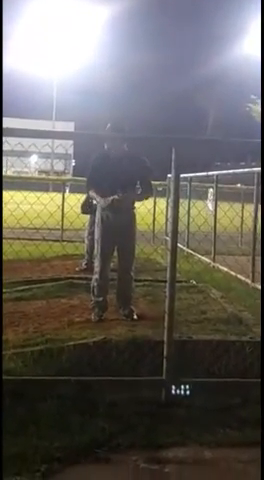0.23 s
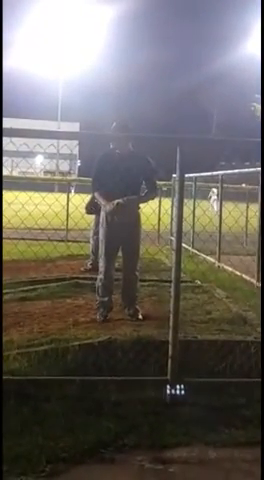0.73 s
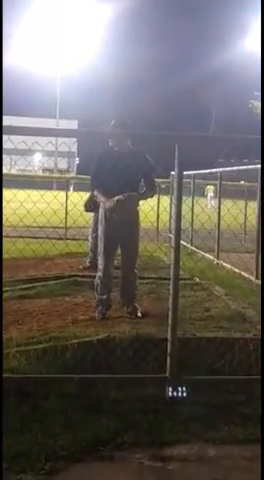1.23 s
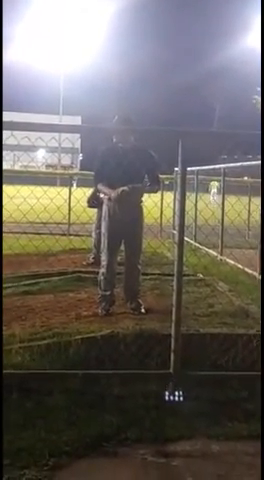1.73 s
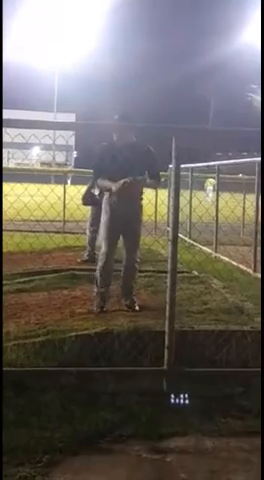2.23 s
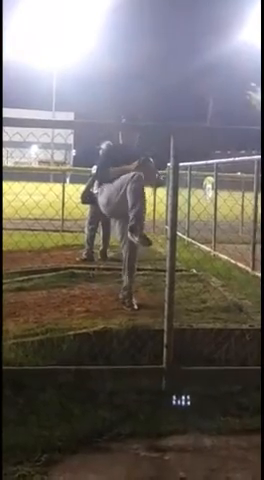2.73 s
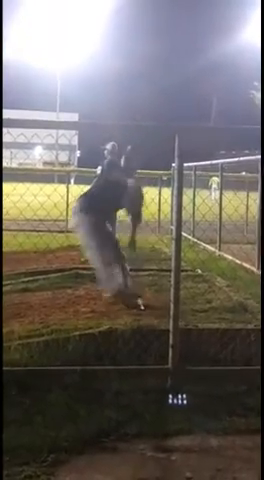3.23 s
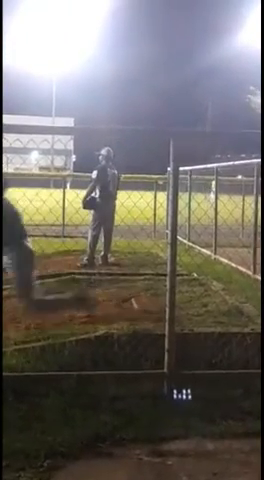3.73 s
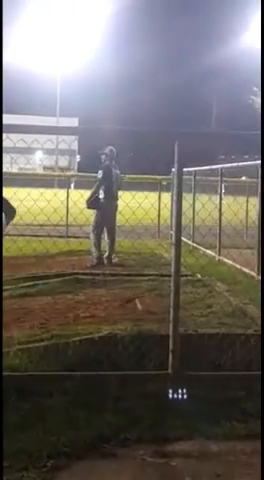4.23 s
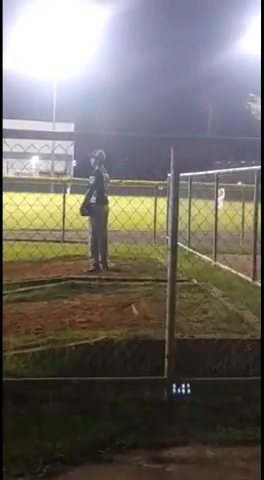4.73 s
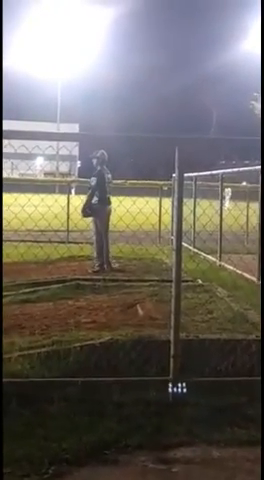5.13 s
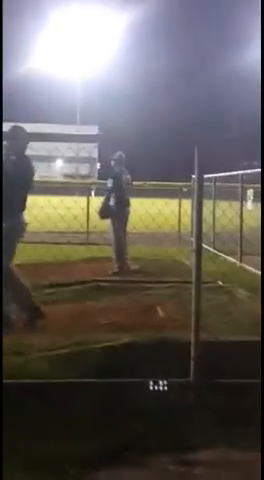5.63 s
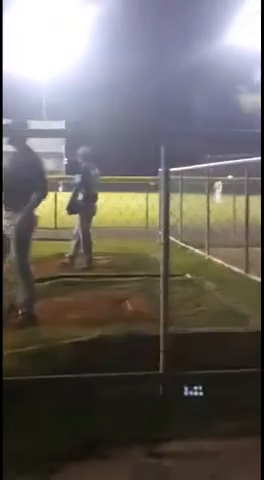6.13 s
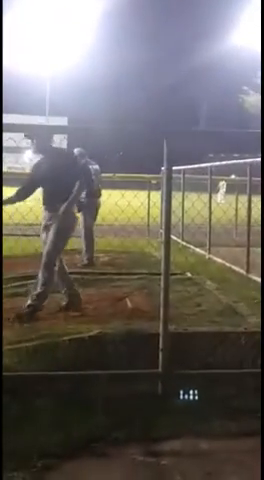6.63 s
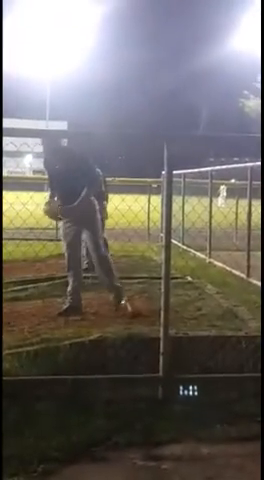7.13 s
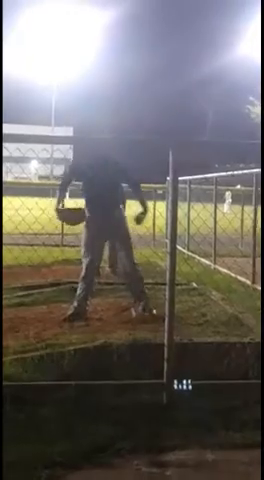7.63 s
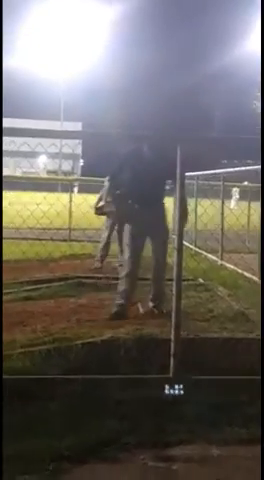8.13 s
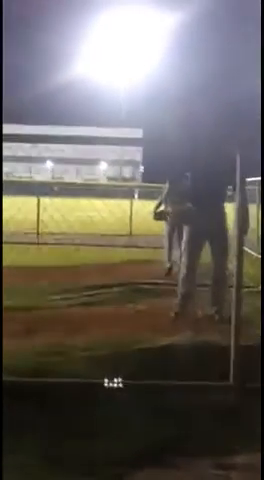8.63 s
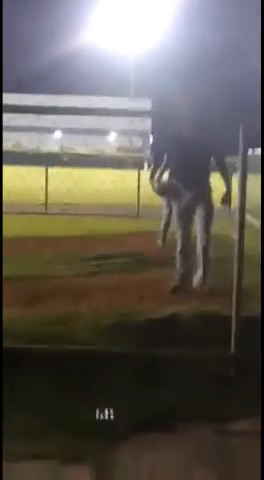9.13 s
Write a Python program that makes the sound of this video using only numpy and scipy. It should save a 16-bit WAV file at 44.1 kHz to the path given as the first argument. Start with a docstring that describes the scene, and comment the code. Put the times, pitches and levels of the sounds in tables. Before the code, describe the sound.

Crickets shimmer continuously, with pulsed trills close by and a blurred chorus farther off; soft frog croaks sit beneath. After a few quiet seconds a foot lands and gravel crunches, and a sharp leather crack rings across the open field with quick slaps of echo and a fading tail. Steps on dirt, a duller glove catch and light sandy scraping follow. Handheld microphone near the mound, mono, slight low air rumble.

```python
"""Crickets trill and far frogs murmur over a low night wash beside a ballfield: pulsed tones and shaped noise.
A pitcher warms up: his cleats thud (damped sines) and scrape (grainy noise) on the dirt mound.
His pitch cracks into the catcher's mitt, a noise burst over a cavity thump; discrete echoes and a decaying
scatter tail come back from walls, fences and stands.
He walks back over the dirt, takes the softer return throw in his own glove, and scrapes at the mound."""
import sys
import numpy as np
from scipy import signal
from scipy.fft import rfft, irfft, next_fast_len
from scipy.io import wavfile
from scipy.ndimage import uniform_filter1d

SR = 44100
rng = np.random.default_rng(int(sys.argv[2]) if len(sys.argv) > 2 else 0)


def waveform_to_disk(signal):
    """Save audio, clipped to [-1, 1], as 16-bit WAV at the path in sys.argv[1]."""
    frames = np.transpose(np.atleast_2d(signal))
    scaled = np.clip(frames, -1, 1) * 32767
    samples = np.round(scaled).astype(np.int16)
    wavfile.write(sys.argv[1], SR, samples)


N = 413655  # samples
TIME = np.arange(N) / SR


def amp(db):
    """Decibel law: 20 dB is a factor of ten in amplitude."""
    return 10 ** (np.asarray(db) / 20)


def unit(x):
    """Normalization to unit root-mean-square."""
    return x / np.sqrt(np.mean(x ** 2) + 1e-20)


def read(points, hz):
    """Interpolation of a spectrum along logarithmic frequency."""
    point_hz, value = np.transpose(points)
    return np.interp(np.log(hz + 1), np.log(point_hz + 1), value)


def add(mix, start_s, sound):
    """Superposition: a sound is summed into the mix from its start time."""
    part = mix[max(round(start_s * SR), 0):][:len(sound)]
    part += sound[:len(part)]


def swell(middle_s, half_width_s):
    """Gaussian envelope: a smooth rise and fall around a moment."""
    return np.exp(-((TIME - middle_s) / half_width_s) ** 2)


def drift(corner_hz):
    """Low-passed noise: a random wander of unit size, no faster than about the corner."""
    size = next_fast_len(N, real=True)
    spectrum = rfft(rng.standard_normal(size))
    low_pass = 1 / (1 + (np.fft.rfftfreq(size, 1 / SR) / corner_hz) ** 4)
    return unit(irfft(spectrum * low_pass, size)[:N])


def colour(x, points, size=2048):
    """Minimum-phase filtering: a causal filter with the given spectrum keeps the power of white noise."""
    hz = abs(np.fft.fftfreq(size, 1 / SR))
    log_gain = np.log(amp(read(points, hz)))
    # the Hilbert transform of the log gain gives the minimum phase
    taps = np.fft.ifft(np.exp(np.conj(signal.hilbert(log_gain)))).real[:size // 2]
    return signal.fftconvolve(x, taps / np.linalg.norm(taps))[:len(x)]


def grit(size, spread_db):
    """Granular noise: grains of 20 samples each have their own strength."""
    strength = np.repeat(rng.standard_normal(size // 20 + 1), 20)[:size]
    return unit(rng.standard_normal(size) * amp(spread_db * np.clip(strength, -2, 2)))


def patchy(x, depth_db):
    """Multipath interference: narrow bands swell and fade at random."""
    spectrum = signal.stft(x, SR, nperseg=512, noverlap=384)[2]
    field = uniform_filter1d(rng.standard_normal(spectrum.shape), 9, 1)  # smooth in time
    field = uniform_filter1d(field, 3, 0)  # smooth in frequency
    gain = unit(amp(depth_db * np.clip(unit(field), -2, 1.5)))
    return signal.istft(spectrum * gain, SR, nperseg=512, noverlap=384)[1][:len(x)]


def scatter(x, t60, wet):
    """Diffuse reflection: a noise tail losing 60 dB in t60 seconds is convolved in beside the direct sound."""
    t = TIME[:SR // 2]
    tail = rng.standard_normal(len(t)) * amp(-60 * t / t60)
    return x + wet * signal.fftconvolve(x, tail / np.linalg.norm(tail))[:len(x)]


def thump(hz, length):
    """Damped cavity resonance: a few cycles swell quickly and die."""
    t = np.arange(int(2 * length * SR)) / SR
    u = t / (.4 * length)
    return u ** 2 * np.exp(1 - u ** 2) * np.sin(2 * np.pi * hz * t)


# spectrum of the distant town wash: pitch_hz [Hz], relative level_db [dB]
AIR_SPECTRUM = [(20, -16), (45, -2), (70, 3.5), (150, 4), (300, -4), (700, -7), (1200, -6.5), (2000, -14.5),
                (3200, -24.5), (4300, -22), (7200, -18), (8800, -43), (12000, -39), (14500, -45)]
# low swells of air on the microphone: middle_s [s], half_width_s [s], level_db [dB]
GUSTS = [(.2, .16, -63), (.58, .11, -62), (4.92, .05, -64), (5.4, .18, -69), (6.15, .16, -65)]
CALM_DB = -80.5  # rumble between gusts


def night_air():
    """Shaped noise: a distant town wash with a low rumble that swells in gusts."""
    wash = colour(rng.standard_normal(N), AIR_SPECTRUM) * amp(-71.5 + .8 * drift(2))
    rumble_spectrum = [(20, -8), (55, 4), (110, -2), (180, -7.5), (350, -27), (1000, -65)]
    rumble = colour(rng.standard_normal(N), rumble_spectrum)
    gusts = sum(amp(db) * swell(middle, half_width) for middle, half_width, db in GUSTS)
    return wash + rumble * (amp(CALM_DB) + gusts)


def croak(hz, length, rasp_hz):
    """Frequency modulation by noise: one short note with a rough pitch."""
    t = TIME[:int(length * SR)]
    turns = np.cumsum(hz + rasp_hz * rng.standard_normal(len(t))) / SR
    return np.hanning(len(t)) * np.sin(2 * np.pi * turns)


def frogs(hz, spread_hz, per_s, length, level_db, rasp_hz):
    """Random superposition: short far notes, each of its own time, pitch, strength and length."""
    out = np.zeros(N)
    draws = rng.uniform(-1.3, 1, (int(per_s * N / SR), 4))
    for k, (when, pitch, size, span) in enumerate(draws):
        note = croak(hz + spread_hz * pitch, length * 2 ** (.6 * span), rasp_hz)
        add(out, (k + .5 + when) / per_s, amp(6 * size) * note)
    return amp(level_db) * unit(out)


# gain of the high peepers over time: time_s [s], gain_db [dB]
PEEPER_GAIN = [(0, -3), (.75, 2), (1.75, -8), (2.3, 3), (4, -3), (6.2, 1), (7.7, -3), (9.38, 0)]
# merged far frogs: pitch_hz [Hz], half_width_hz [Hz], mean level_db [dB]
MURMUR = [(720, 55, -79), (2330, 170, -83)]
# louder croaks: start_s [s], pitch_hz [Hz], length_s [s], level_db [dB]
CROAKS = [(1.49, 670, .08, -58), (3.527, 634, 0.053, -51), (5.71, 660, 0.049, -55.5),
          (6.14, 720, .055, -54), (7.021, 729, 0.11, -55.5), (7.611, 626, 0.051, -56)]


def pond():
    """Blurring by distance: low croakers and high peepers; the farthest merge into narrow noise bands."""
    out = frogs(hz=705, spread_hz=50, per_s=9, length=.055, level_db=-74.5, rasp_hz=380)
    peepers = frogs(hz=2370, spread_hz=170, per_s=20, length=.07, level_db=-75, rasp_hz=520)
    out += peepers * amp(np.interp(TIME, *np.transpose(PEEPER_GAIN)))
    for hz, width_hz, db in MURMUR:
        out += amp(db + 4 * drift(7)) * drift(width_hz) * np.sin(2 * np.pi * hz * TIME)
    for start, hz, length, db in CROAKS:
        add(out, start, amp(db) * croak(hz, length, rasp_hz=464))
    return scatter(out, t60=0.27, wet=.5)


def katydid(start=3.49, hz=8100, rate=8.57, quicken=.17, tick_share=.035, level_db=-75):
    """Pulsed narrow-band noise: a faint high tick slowly quickens, uneven and blurred by the grass."""
    t = np.maximum(TIME - start, 0)
    u = (rate * t + .5 * quicken * t ** 2) % 1 / tick_share  # rate per s, quicken per s squared
    ticks = u * np.exp(1 - u) * amp(level_db + 3 * drift(4))
    return scatter(ticks * drift(130) * np.sin(2 * np.pi * hz * TIME), t60=.35, wet=.9)


def wing_tone(phase, pitch, depth):
    """Stridulation: the wing rings at a pitch and each stroke of the file pulses it."""
    pulse = 1 - depth + depth * np.sin(np.pi * phase) ** 2
    return pulse * np.sin(2 * np.pi * np.cumsum(pitch) / SR)


def cricket(hz, strokes, sag_hz, depth, wander_hz, wet):
    """Continuous stridulation: the pitch sags during each stroke of the file."""
    phase = np.cumsum(strokes * (1 + .012 * drift(3))) / SR % 1
    pitch = hz + sag_hz * (.5 - phase) + wander_hz * drift(6)
    return unit(scatter(wing_tone(phase, pitch, depth), t60=.3, wet=wet))


def song(rows, strokes, sag_hz, depth, jitter_hz, flutter_db, ramp_s, wet):
    """Gated stridulation: each call swells, holds one wing pitch and stops; strokes pulse and pull it."""
    out = np.zeros(N)
    jitter, flutter = jitter_hz * drift(90), unit(amp(flutter_db * drift(14)))
    for (start, length, hz, db), (place, turn) in zip(rows, rng.random((len(rows), 2))):
        t = TIME[:int((length + ramp_s) * SR)]
        first = int(place * N / 2)  # each call takes its own stretch of the wander
        part = slice(first, first + len(t))
        phase = (strokes * t + turn) % 1
        pitch = hz + sag_hz * (.5 - phase) + jitter[part]
        wing = unit(wing_tone(phase, pitch, depth))
        gate = np.clip(np.minimum(t, t[-1] - t) / ramp_s, 0, 1)
        add(out, start - ramp_s / 2, amp(db) * gate * flutter[part] * wing)
    return scatter(out, t60=.16, wet=wet) / np.hypot(1, wet)


# pitches of the fainter random chirps: pitch_hz [Hz], rate [chirps per s], middle level_db [dB]
SINGERS = [(5760, 9, -69), (6350, 9, -70.5), (6770, 7, -72.5)]
CHIRP_S, CHIRP_SPREAD_HZ, CHIRP_SPREAD_DB = .06, 130, 4


def stray_chirps():
    """Random sequence: rows of faint chirps, uneven in time, length, pitch and strength."""
    rows = []
    for hz, per_s, db in SINGERS:
        draws = rng.uniform(-1, 1, (int(per_s * N / SR), 4))
        for k, (when, span, pitch, size) in enumerate(draws):
            start, length = (k + .5 + when) / per_s, CHIRP_S * 2 ** (.5 * span)
            rows.append((start, length, hz + CHIRP_SPREAD_HZ * pitch, db + CHIRP_SPREAD_DB * size))
    return rows


# far chorus: pitch_hz [Hz], mean level_db [dB], rate [wing strokes per s]
CHORUS = [(4800, -76, 52), (4930, -64, 37), (4964, -64.5, 63), (5046, -63.5, 44), (5097, -67.5, 75)]
# lone far singers that never pause: pitch_hz [Hz], mean level_db [dB], rate [wing strokes per s]
DRONES = [(5750, -74, 31), (6260, -77, 58), (6850, -76.5, 70)]
# clean trills of the nearest crickets: start_s [s], length_s [s], pitch_hz [Hz], level_db [dB before a lift]
TRILLS = [(0, 0.25, 6810, -64.5), (0.32, 0.65, 6805, -63.0), (1.24, 0.49, 6845, -63.0),
          (1.24, 0.22, 6385, -58.5), (3.22, 0.4, 6250, -64.5), (3.58, 0.8, 6845, -64.0),
          (5.84, 0.32, 6845, -66.5), (6.15, 0.32, 6250, -63.5), (7.9, 0.68, 6250, -63.0),
          (9.2, 0.18, 6230, -64.5)]
# blurred chirps farther off in the grass: start_s [s], length_s [s], pitch_hz [Hz], level_db [dB]
CHIRPS = [(0.16, 0.08, 5755, -64.0), (0.6, 0.11, 5720, -63.5), (0.67, 0.09, 6350, -57.5),
          (1.46, 0.09, 5760, -62.5), (1.56, 0.06, 6395, -60.0), (1.64, 0.16, 5745, -63.5),
          (2.0, 0.45, 6820, -66.5), (2.38, 0.12, 5800, -60.5), (2.92, 0.28, 6785, -64.5),
          (3.05, 0.19, 5805, -62.0), (5.13, 0.17, 5770, -62.5), (5.78, 0.22, 5765, -61.0),
          (7.5, 0.32, 5745, -62.5)]


def crickets():
    """Distance by scattering: a blurred far chorus, chirps from the grass, and a few clean trills close by."""
    far = np.zeros(N)
    for hz, db, rate in CHORUS:
        far += amp(db) * cricket(hz, rate, sag_hz=300, depth=1, wander_hz=28, wet=1.9)
    far *= amp(1.1 * drift(10))
    for hz, db, rate in DRONES:
        drone = cricket(hz, rate, sag_hz=110, depth=.6, wander_hz=22, wet=1.9)
        far += amp(db + 3 * drift(8)) * drone
    trills = song(TRILLS, strokes=152, sag_hz=70, depth=.35, jitter_hz=12, flutter_db=1.2, ramp_s=.04, wet=.35)
    chirps = song(CHIRPS + stray_chirps(), strokes=48, sag_hz=110, depth=.5, jitter_hz=42,
                  flutter_db=1.6, ramp_s=.025, wet=.6)
    haze_spectrum = [(3800, -60), (4500, -19), (4950, 6), (5350, -9.5), (5800, 2), (6400, 3.5),
                     (6900, 7), (7300, -17), (8500, -50)]
    haze = patchy(colour(rng.standard_normal(N), haze_spectrum), depth_db=4.5)
    return far + amp(.7) * trills + chirps + amp(-71.5) * haze


# small clinks and faint rings around the mound: start_s [s], pitch_hz [Hz], length_s [s], level_db [dB]
CLINKS = [(0.135, 1040, .07, -63), (0.38, 4300, 0.024, -63), (2.265, 3670, 0.046, -64),
          (2.294, 1340, 0.025, -58.5), (3.73, 1506, 0.068, -62), (3.834, 1510, .11, -63),
          (6.03, 1620, .08, -62), (8.98, 2350, .1, -59), (9.07, 1550, .09, -60)]


def clinks():
    """Impulsive excitation: each is a quick touch and a short, wavering ring."""
    out = np.zeros(N)
    for start, hz, length, db in CLINKS:
        u = np.arange(int(2 * length * SR)) / (length * SR / 4)
        turns = np.cumsum(hz + 650 * rng.standard_normal(len(u))) / SR
        add(out, start, amp(db) * u * np.exp(1 - u) * np.sin(2 * np.pi * turns))
    return out


# spectrum of sandy hiss, for slides and feet: pitch_hz [Hz], relative level_db [dB]
SAND_SPECTRUM = [(500, -35), (3000, -17), (4000, -6), (6000, 1), (8400, 9.5), (10000, -17), (14000, -12)]
# a sole slides slowly over loose sand: middle_s [s], half_width_s [s], level_db [dB]
SLIDES = [(8.99, .13, -67.5), (9.05, .055, -58.5), (9.33, .17, -65)]


def slides():
    """Stick-slip friction: sand hisses under a sliding sole that catches and slips unevenly."""
    hiss = patchy(colour(grit(N, spread_db=4.5), SAND_SPECTRUM), depth_db=5)
    hiss *= unit(amp(1.3 * drift(30)))
    return hiss * sum(amp(db) * swell(middle, half_width) for middle, half_width, db in SLIDES)


# feet on packed dirt: start_s [s], level_db [dB], pitch_hz [Hz], length_s [s]
STEPS = [(2.256, -53.5, 274, 0.019), (3.671, -41, 600, .012), (3.674, -36.5, 285, 0.01),
         (3.699, -44, 235, .02), (5.949, -53, 280, 0.04), (6.06, -39, 580, .008),
         (6.0634, -26, 235, 0.0062), (6.094, -47, 185, .022), (6.134, -48, 185, .02),
         (6.541, -54, 239.4, 0.024), (7.592, -52, 185, 0.037), (8.101, -52, 195, 0.038)]
# cleats dragged through dirt: start_s [s], length_s [s], crunch_db [dB], gravel_db [dB], sand_db [dB]
SCUFFS = [(3.666, .03, -55, -68, -85), (3.724, .07, -60, -69, -82), (3.784, .044, -49, -60, -63),
          (3.832, .049, -49.5, -60, -59), (6.054, .025, -64, -63, -59), (8.545, .06, -60, -54, -63),
          (8.622, .022, -65, -63, -59), (9.2, .06, -66, -65, -72)]
# spectrum of the low crunch: pitch_hz [Hz], relative level_db [dB]
CRUNCH_SPECTRUM = [(100, -12), (450, -2), (600, 5), (730, 6), (900, -20), (3000, -40)]
# spectrum of the gravel: pitch_hz [Hz], relative level_db [dB]
GRAVEL_SPECTRUM = [(600, -28), (1100, -20), (1520, 0), (1700, -6), (1900, 3), (2150, -4), (2450, 2),
                   (3000, -17), (3700, -8), (8000, -42)]


def feet():
    """Impact and granular friction: heels thud on the dirt and cleats drag gravel and sand along."""
    thuds, crunch, gravel, sand = np.zeros((4, N))
    for start, db, hz, length in STEPS:
        add(thuds, start, amp(db) * thump(hz, length))
    for start, length, *levels_db in SCUFFS:
        u = np.arange(int(3 * length * SR)) / (0.363 * length * SR)
        for layer, db in zip((crunch, gravel, sand), levels_db):
            add(layer, start, amp(db) * u * np.exp(1 - u) * grit(len(u), spread_db=4.5))
    scrape = colour(crunch, CRUNCH_SPECTRUM) + colour(gravel, GRAVEL_SPECTRUM) + colour(sand, SAND_SPECTRUM)
    return scatter(thuds, t60=0.33, wet=.48) + scatter(patchy(scrape, depth_db=4.5), t60=.42, wet=0.36)


# spectrum of the loud echo's rush: pitch_hz [Hz], relative level_db [dB]
STANDS_SPECTRUM = [(200, -11), (450, -15), (740, -4), (1130, 2), (1320, -9), (1500, 3), (1680, -7),
                   (2350, 5), (4000, -2), (6000, -12), (8000, -40)]
# far surfaces, one band of a pop each:
# middle_s [s], half_width_s [s], pitch_hz [Hz], half_bandwidth_hz [Hz], level_db [dB]
FAR_BANDS = [(4.545, .04, 280, 110, -42), (4.99, .08, 1490, 55, -62), (5.03, .035, 2450, 150, -52),
             (5.04, .025, 690, 90, -55), (5.11, .09, 1120, 70, -56), (5.14, .05, 770, 80, -54),
             (5.18, .09, 2170, 200, -60), (6.895, .055, 1020, 200, -50), (6.94, .05, 2350, 200, -59)]


def far_echo(middle_s=5.05, half_width_s=0.13, level_db=-52.5):
    """Selective reflection: stands and trees return the pops in separate bands, the loud one in a faint rush."""
    rush = patchy(colour(grit(N, spread_db=4), STANDS_SPECTRUM), depth_db=4)
    out = amp(level_db) * rush * swell(middle_s, half_width_s)
    for middle, half_width, hz, band_hz, db in FAR_BANDS:
        band = unit(drift(band_hz) * np.sin(2 * np.pi * hz * TIME))
        out += amp(db) * swell(middle, half_width) * band
    return out


# ring of the field, before the early and late shares scale it: pitch_hz [Hz], t60_s [s]
FIELD_T60 = [(100, 1.56), (350, 1.05), (850, 0.46), (1700, 1.4), (2600, 1.48), (5500, 1.16), (7500, 0.78),
             (12000, 0.25)]


def field_ring(start_s, level_db, spectrum, hold, early_share, late_db, late_share, reach, grain_db, patch_db):
    """Double-slope decay: fence wire and ground scatter a pop, level while near fences answer, then fading."""
    out, t = np.zeros(N), TIME[:2 * SR]
    noise = patchy(colour(grit(len(t), grain_db), spectrum), patch_db)
    hz, frames, z = signal.stft(noise, SR, nperseg=256)
    age = np.maximum(frames - hold, 0)
    t60 = read(FIELD_T60, hz)[:, None]
    early = amp(-60 * age / (t60 * early_share))
    late = amp(late_db - 60 * age / (t60 * late_share))
    ring = signal.istft(z * np.hypot(early, late), SR, nperseg=256)[1][:len(t)]
    ring *= unit(amp(1.1 * drift(110)))[:len(t)]  # posts and rails answer in clumps
    onset, out_of_reach = 1 - np.exp(-t / .007), np.exp(-(t / reach) ** 4)
    add(out, start_s, amp(level_db) * ring * onset * out_of_reach)
    return out


BURST_SIZE, LEAD = 2048, 256  # samples


def burst(length, spectrum_db):
    """Broadband impact noise: a short, dense crackle with the given spectrum starts at sample LEAD."""
    u = (np.arange(BURST_SIZE) - LEAD) / (length * SR)
    envelope = np.exp(-(2 * u - 1) ** 8)
    z = rng.standard_normal(BURST_SIZE)
    for _ in range(12):
        z = np.tanh(2 * z / abs(z).max()) * envelope  # even in time
        z = irfft(np.exp(1j * np.angle(rfft(z))) * amp(spectrum_db))  # impose the spectrum
    z *= np.clip(1 + 10 * u, 0, 1) ** 2  # an abrupt front
    return z * np.sqrt(length * SR) / np.linalg.norm(z)


# what any rebound does to the treble: pitch_hz [Hz], gain_db [dB]
REBOUND_GAIN = [(7500, 1), (9000, -5.5), (10500, -23)]
# what air and grass do to an echo: pitch_hz [Hz], gain rate [dB per s of delay]
TRAVEL_GAIN = [(400, 0), (800, -45), (1250, -20), (1750, 18), (2700, -20), (4500, 9), (6000, -18),
               (7500, -26), (14000, -18)]
# rough surfaces blur each crack a little and so give it their own colour
FACET_T60_S, FACET_WET, POCKET_WET = .014, .65, .25


def leather_hit(leather, crack_db, crack_len, tilt_db, thump_db, hz, thump_len, delay):
    """Impact and cavity resonance: leather slaps, the pocket thumps; reflection and travel recolour an echo."""
    hit, f = np.zeros(2 * BURST_SIZE), np.fft.rfftfreq(BURST_SIZE, 1 / SR)
    add(hit, LEAD / SR - thump_len / 10, amp(thump_db) * thump(hz, thump_len))
    # a small pocket radiates no deep bass
    hit = signal.sosfilt(signal.butter(4, 175, "high", fs=SR, output="sos"), hit)
    path_db = (delay > 0) * read(REBOUND_GAIN, f) + delay * read(TRAVEL_GAIN, f)
    crack = burst(crack_len, read(leather, f) + tilt_db * np.log2(f + 1) + path_db)
    wet = FACET_WET if delay > 0 else POCKET_WET
    add(hit, 0, amp(crack_db) * scatter(crack, FACET_T60_S, wet))
    return hit


def catch(pop, echoes, smear, leather):
    """Discrete reflection: the direct pop, then its echoes, each longer the farther it has come."""
    out = np.zeros(N)
    start, *blow = pop
    crack_len, hz, thump_len, smear_per_s = smear
    add(out, start - LEAD / SR, leather_hit(leather, *blow, delay=0))
    for arrival, crack_db, tilt_db, thump_db in echoes:
        delay = arrival - start
        longer = smear_per_s * delay
        echo = leather_hit(leather, crack_db, crack_len + longer, tilt_db, thump_db, hz, thump_len + longer, delay)
        add(out, arrival - LEAD / SR, echo)
    return out


# the return throw's pop: start_s [s], crack_db [dB], crack_length_s [s], brightness [dB per octave],
# thump_db [dB], thump_hz [Hz], thump_length_s [s]
GLOVE_POP = (6.7139, -19.5, .0064, 1.5, -8.8, 775, .008)
# its echoes from hard surfaces: arrival_s [s], crack_db [dB], brightness [dB per octave], thump_db [dB]
GLOVE_ECHOES = [(6.728, -42, 1, -41), (6.7595, -38, -1, -35), (6.7697, -22, -3, -26), (6.783, -42, -2, -39),
                (6.8305, -46, 4, -54), (6.8395, -38.5, 4.5, -45), (6.926, -45.5, -1, -46)]
# echo shape: crack_length_s [s], thump_hz [Hz], thump_length_s [s], smear [s per s of delay]
GLOVE_SMEAR = (.0045, 830, .0058, .012)
# spectrum of the glove's slap: pitch_hz [Hz], relative level_db [dB]
SLAP_SPECTRUM = [(100, -30), (250, -1), (480, 1), (1150, 4), (1700, -4.5), (2400, -10), (3500, -23),
                 (7500, -19.5), (9500, -36.5), (14000, -33)]
# spectrum of the field's answer to it: pitch_hz [Hz], relative level_db [dB]
GLOVE_TAIL = [(60, -22), (160, -20), (260, -1), (440, -3), (800, 7), (1200, 4), (1800, -8), (2400, -5),
              (3000, -15), (4000, -10), (6300, -14.5), (7400, -9), (10000, -38)]


def glove_catch():
    """Impact with reverberation: the return throw slaps the pitcher's glove and the field answers."""
    pop = catch(GLOVE_POP, GLOVE_ECHOES, GLOVE_SMEAR, SLAP_SPECTRUM)
    ring = field_ring(6.716, level_db=-39.5, spectrum=GLOVE_TAIL, hold=0.012, early_share=.4, late_db=-1.0,
                      late_share=1.9, reach=0.28, grain_db=1.8, patch_db=4.5)
    return pop + ring


# the pitch's pop: start_s [s], crack_db [dB], crack_length_s [s], brightness [dB per octave],
# thump_db [dB], thump_hz [Hz], thump_length_s [s]
MITT_POP = (4.3846, -7.6, .0021, 0, -5, 305, .0062)
# its echoes from hard surfaces: arrival_s [s], crack_db [dB], brightness [dB per octave], thump_db [dB]
MITT_ECHOES = [(4.3974, -15, 2.5, -25), (4.4013, -24, 3, -45), (4.4056, -25, 5, -45),
               (4.4139, -13.5, 4.5, -7.5), (4.4421, -24, 4, -33), (4.4523, -16, 3, -20),
               (4.5838, -33, 1.5, -24), (4.6012, -26, 1, -22), (4.6033, -24.5, .5, -19),
               (4.6125, -38, 0, -28), (4.634, -41, 0, -26), (4.657, -39, 3, -44), (4.6902, -36.5, 2.5, -48),
               (4.9745, -46, -2.5, -67), (5.018, -42.5, -3, -67), (5.0875, -51, -3, -64)]
# echo shape: crack_length_s [s], thump_hz [Hz], thump_length_s [s], smear [s per s of delay]
MITT_SMEAR = (.001, 365, .0062, .006)
# spectrum of the mitt's crack: pitch_hz [Hz], relative level_db [dB]
CRACK_SPECTRUM = [(150, -28), (720, -14), (1150, 4), (1450, -1), (1720, -13), (2150, 3), (3200, 2),
                  (3800, -8), (4200, -3), (5500, -5), (7200, -3.5), (8200, -14), (9500, -29), (14000, -25)]
# spectrum of the field's answer to it: pitch_hz [Hz], relative level_db [dB]
MITT_TAIL = [(40, -19), (90, -18), (170, -6), (280, 2.5), (730, -1), (1150, -1), (1700, 0), (2300, .5),
             (3500, -7), (5000, -2), (6200, -7), (7500, -6.5), (8900, -20.5), (10000, -46), (14000, -58)]
# spectrum of the low wash after the strong late echo: pitch_hz [Hz], relative level_db [dB]
WALL_TAIL = [(60, -20), (150, -5), (250, 5), (430, 2), (720, -26), (1500, -4), (4000, -12), (7500, -13),
             (9500, -55)]


def mitt_catch():
    """Impact with reverberation: the pitch cracks into the mitt, the field rings and a low wash follows."""
    pop = catch(MITT_POP, MITT_ECHOES, MITT_SMEAR, CRACK_SPECTRUM)
    ring = field_ring(4.386, level_db=-28.5, spectrum=MITT_TAIL, hold=0.1, early_share=0.1, late_db=-4.6,
                      late_share=1.13, reach=.75, grain_db=1.8, patch_db=3)
    wash = field_ring(4.6, level_db=-41, spectrum=WALL_TAIL, hold=.03, early_share=.25, late_db=-12,
                      late_share=.8, reach=.4, grain_db=1.5, patch_db=3.5)
    return pop + ring + wash


def scene():
    """Superposition: the night, the feet and both catches with their echoes, alike in two channels."""
    night = night_air() + pond() + katydid() + crickets()
    mound = clinks() + slides() + feet()
    catches = far_echo() + glove_catch() + mitt_catch()
    return np.tile(night + mound + catches, (2, 1))


EDGE_HZ = 14900  # upper band limit


def record(dry):
    """Filtering and saturation: a microphone's wind filter, soft overload near 0.92, then the band limit."""
    filtered = signal.sosfilt(signal.butter(2, 100, "high", fs=SR, output="sos"), dry)
    held = filtered / (1 + (filtered / .92) ** 12) ** (1 / 12)
    low_pass = signal.firwin(255, EDGE_HZ, window=("kaiser", 8), fs=SR)
    return signal.oaconvolve(held, low_pass[None], "same")


dry = scene()
out = record(dry)
waveform_to_disk(out)
```